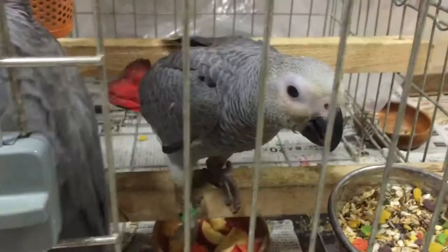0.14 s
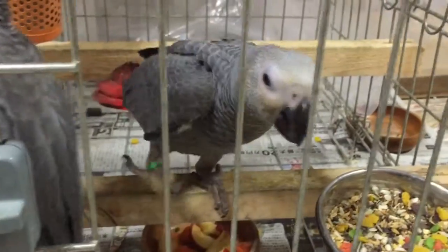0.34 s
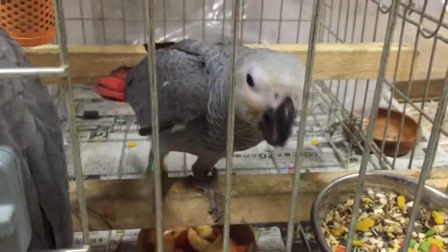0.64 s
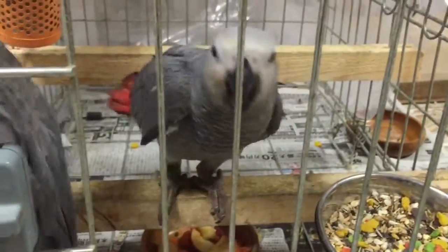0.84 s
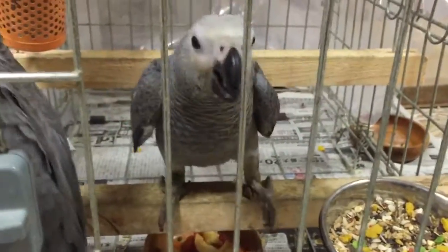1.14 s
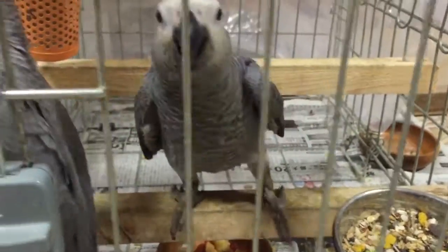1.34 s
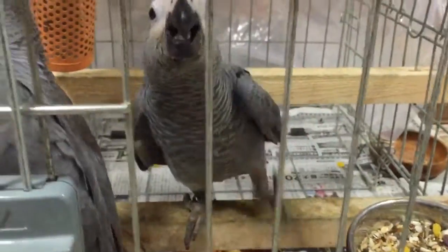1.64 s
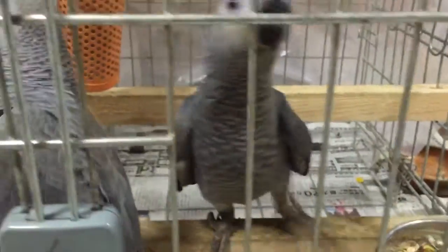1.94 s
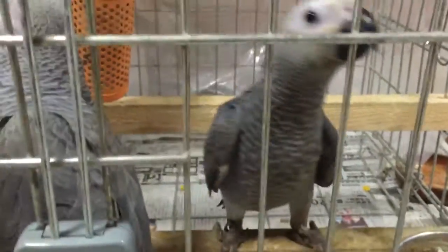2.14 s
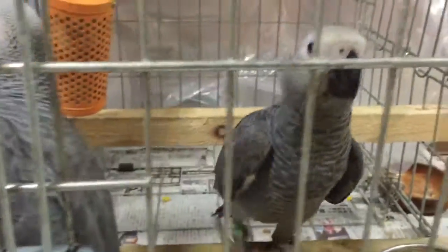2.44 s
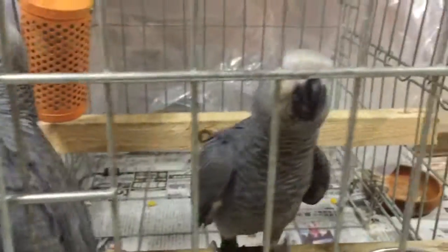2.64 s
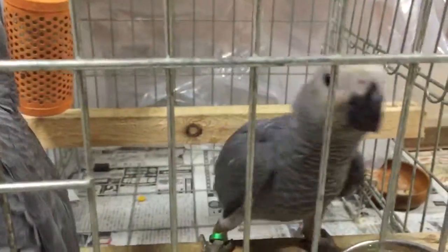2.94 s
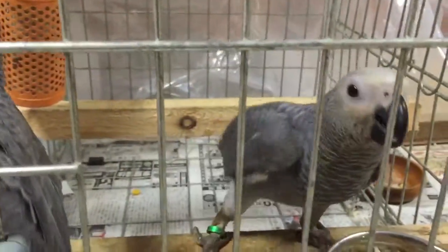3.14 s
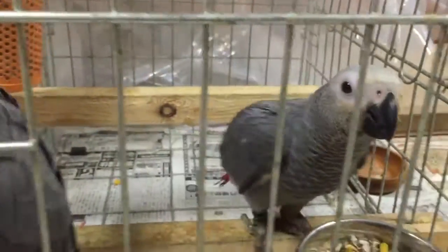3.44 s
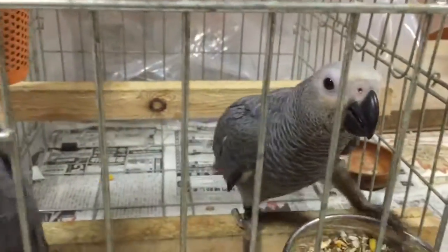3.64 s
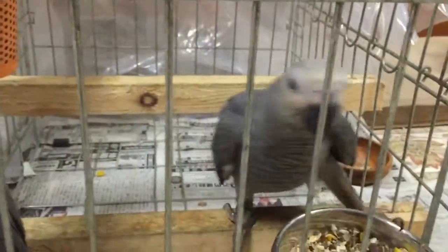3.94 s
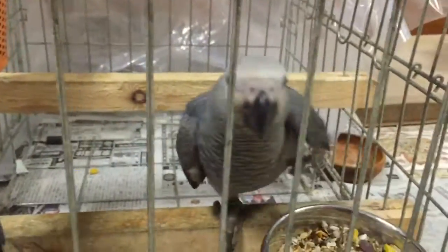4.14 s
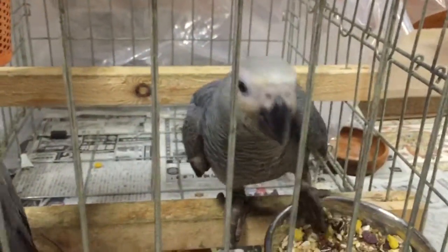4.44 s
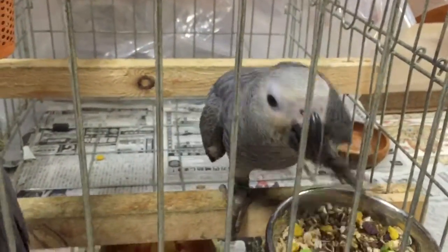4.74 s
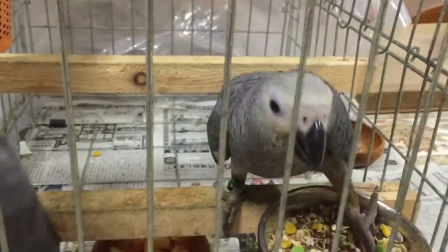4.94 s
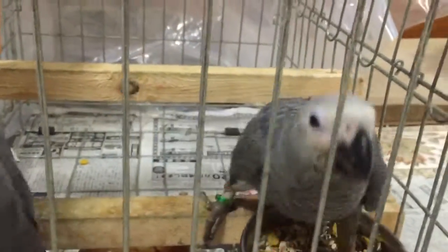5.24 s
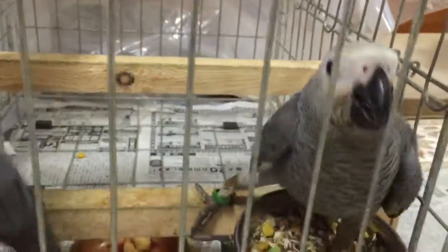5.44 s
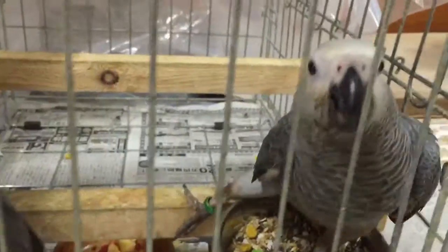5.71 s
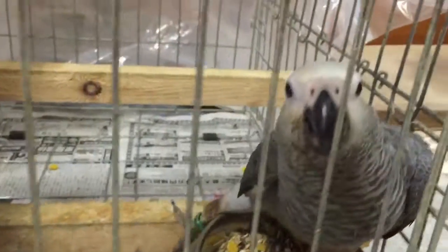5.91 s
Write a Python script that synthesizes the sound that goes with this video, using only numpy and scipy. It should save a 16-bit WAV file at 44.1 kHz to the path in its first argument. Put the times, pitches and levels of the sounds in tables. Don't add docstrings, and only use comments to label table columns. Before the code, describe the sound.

Close to a wire cage in a small quiet room, claws and beaks tick and scrape irregularly on metal bars. A slap with a light door rattle comes early, then sparse clicks, a very short squeak turning hoarse, and bright sharp pecks. Near the end a steel bowl rings, is stopped by two heavy foot landings, and small taps and scratches follow. Low hum and faint hiss lie beneath.

```python
import sys
import numpy as np
from scipy import signal
from scipy.fft import rfft, irfft, next_fast_len
from scipy.io import wavfile
from scipy.ndimage import uniform_filter1d

SR = 44100
rng = np.random.default_rng(int(sys.argv[2]) if len(sys.argv) > 2 else 0)


def convert_level_to_amplitude(level_db):
    exponent = np.asarray(level_db, float) / 20
    return 10 ** exponent


def transcribe(u):
    v = np.clip(np.atleast_2d(u).T, -1, 1)
    q = np.round(v * 32767).astype(np.int16)
    wavfile.write(sys.argv[1], SR, q)


N = 267687
T = np.arange(N) / SR


def unit(x):
    return x / np.sqrt(np.mean(x ** 2))


def fade(t, t60):
    return np.exp(-np.log(1000) * t / np.maximum(t60, .002))


def colour(x, hz, db):
    size = next_fast_len(len(x))
    f = np.maximum(np.fft.rfftfreq(size, 1 / SR), 1)
    gain = convert_level_to_amplitude(np.interp(np.log(f), np.log(hz), db))
    return irfft(rfft(x, size) * gain, size)[:len(x)]


def resonate(x, peaks):
    return sum(convert_level_to_amplitude(db) * signal.lfilter(*signal.iirpeak(hz, hz / max(width, 5), SR), x)
               for hz, width, db in peaks)


def walk(rate_hz, size=N):
    k = int(SR / rate_hz)
    steps = np.repeat(rng.standard_normal(size // k + 1), k)
    return 1.33 * uniform_filter1d(uniform_filter1d(steps, k), k)[:size]


def add(out, start_s, x):
    i = int(round(start_s * SR))
    out[i:i + len(x)] += x[:N - i]


# pitch_hz [Hz], density_db [dB per Hz]
HISS_SPECTRUM = [(15, -27), (25, -5), (49, -1.5), (80, -0.5), (120, -1.5), (223, -12), (516, -21),
                 (775, -20.5), (1230, -19), (1650, -20.5), (5000, -26.5), (9320, -27), (10400, -31.5),
                 (14800, -28.5), (16000, -52)]
# pitch_hz [Hz], width_hz [Hz], level_db [dB]
HUM = [(57.6, 8.8, -70), (101, 16.7, -74)]


def hush():
    hz, db = np.transpose(HISS_SPECTRUM)
    hiss = unit(colour(rng.standard_normal(N), hz, db)) * convert_level_to_amplitude(-68.5 + 0.29 * walk(2.33))
    hum = 0
    for hz, width, db in HUM:
        line = unit(resonate(rng.standard_normal(N), [(hz, width, 0)]))
        hum = hum + convert_level_to_amplitude(db + 2.0 * walk(4.15)) * line
    return hiss + hum


# pitch_hz [Hz], width_hz [Hz], level_db [dB]
MESH = [(1826, 54, 7.5), (2300, 16, -9), (3460, 7.7, -4), (4410, 16, -28.5), (6190, 77, 3),
        (6800, 600, 3.5), (7350, 120, -5.5), (8490, 260, 8), (9180, 110, 7.5), (11370, 140, 4),
        (11930, 97, -4), (13100, 58, 0)]


def wire(x):
    return unit(x) + 0.39 * unit(resonate(x, MESH))


# start_s [s], length_s [s], level_db [dB], weight_db on the perch [dB]
DRAGS = [(0, 0.06, -59.5, -9), (0.597, 0.11, -70.5, 15), (0.845, 0.23, -74, 12.5), (1.09, 0.26, -64.5, 6),
         (1.445, 0.22, -64, 5), (2.553, 0.2, -74, 17), (3.303, 0.43, -70, 10), (3.733, 0.15, -73.5, 14.5),
         (4.411, 0.19, -66.5, -20), (4.88, 0.096, -63.5, 8.5), (4.939, 0.17, -64, 4.5),
         (5.033, 0.23, -60, -13), (5.145, 0.12, -66.5, 0), (5.49, .14, -65, -8), (5.614, 0.15, -65.5, 1),
         (5.719, 0.17, -52, -15), (5.853, 0.18, -61, -11)]


def scrape():
    attack_s, release_share, sag_db = 0.008, 0.55, -8
    slips = wire(rng.standard_normal(N) * convert_level_to_amplitude(0.89 * walk(400) + 3.0 * walk(50)))
    low = unit(colour(slips, [120, 940, 1500, 1650], [-9.5, -6, -1.5, -30.5]))
    mid = unit(colour(slips, [1400, 240, 12000, 5900], [-9.5, -6, -1.5, -30.5]))
    high = unit(colour(slips, [4970, 2100, 12700, 8900], [-9.5, -6, -1.5, -30.5]))
    out = np.zeros(N)
    for start_s, length_s, db, weight_db in DRAGS:
        span = slice(int(start_s * SR), int((start_s + length_s) * SR))
        t = T[span] - start_s
        grip = np.interp(t, [0, attack_s, (1 - release_share) * length_s, length_s], [0, 1, 1, 0])
        grip = grip * convert_level_to_amplitude(db + sag_db * t / length_s)
        highs_db = -12 - 0.39 * max(weight_db, 0)
        out[span] += grip * (convert_level_to_amplitude(weight_db) * low[span] + mid[span] + convert_level_to_amplitude(highs_db) * high[span])
    return out


LOOSE_HZ = [1250, 1900, 2500, 3720, 4200, 5600, 6730, 7400, 8600, 9300, 10300, 11600, 12600, 14200]


def contact(low_db, high_db, hz, size):
    noise = rng.standard_normal((2, size))
    loose = rng.uniform(size=(len(LOOSE_HZ), 2))
    tone_db = [low_db - 43.5, low_db + 9.5, 0, high_db - 1.5, high_db - 5]
    crack, buzz = (colour(n, [350, 1000, 3500, 10000, 16000], tone_db) for n in noise)
    struck = [(f, 60 + 0.025 * f, -10 * np.log10(60 + 0.025 * f)) for f in np.atleast_1d(hz)]
    others = [(f * (1 + .05 * (u - .5)), 130, -14 * v) for f, (u, v) in zip(LOOSE_HZ, loose)]
    crack = unit(crack) + 0.62 * unit(resonate(noise[0], struck))
    buzz = wire(buzz) + 0.8 * unit(resonate(noise[1], struck)) + 0.55 * unit(resonate(buzz, others))
    spread = np.sqrt(1 + convert_level_to_amplitude(2 * low_db) + convert_level_to_amplitude(2 * high_db))
    return spread * crack, spread * buzz * convert_level_to_amplitude(1.6 * walk(300, size))


# start_s [s], peak_db [dB], struck_hz [Hz], rattle_db [dB], at times second_hz [Hz]
FLICKS = [(0.0088, -37, 5600, -19, 6300), (0.802, -45, 5500, -8.5, 4000), (0.9386, -43, 9300, -5),
          (1.029, -54, 6950, -6), (2.1334, -36, 9200, -22.5), (3.6369, -40, 9000, -12, 13000),
          (3.641, -38, 12000, -20, 9500), (4.541, -58, 13000, -25), (4.551, -58, 12000, -25),
          (4.561, -57, 13000, -25), (4.574, -55, 12000, -25)]
PECKS = [(0.8573, -35, 5300, -5), (3.3328, -33.5, 3460, -7, 2000), (3.3855, -29, 7000, -13, 9180),
         (3.6583, -26.5, 8100, -15.5), (4.1766, -25, 8540, -14, 12400), (4.1785, -18, 8540, -24, 11400),
         (4.1812, -27, 12400, -20), (4.1862, -29, 7380, -18), (4.4762, -40, 6600, -11, 4000),
         (4.4925, -25.5, 9600, -28, 12000), (4.5914, -57.5, 1600, -20), (5.111, -55, 2990, -1.5),
         (5.7164, -44.5, 5310, -3, 2350), (5.7412, -35, 6800, -3, 2350)]
CATCHES = [(0.8432, -33, 3600, -10, 5500), (1.8307, -55, 6000, -24), (1.8533, -51, 3270, -26),
           (2.628, -42, 11900, -6, 13200), (1.0918, -46, 4160, -14), (1.1083, -42, 9000, -14),
           (2.552, -52, 4000, -20), (5.519, -34, 5380, -4.5, 7200), (5.486, -45, 3800, -25),
           (3.386, -38, 1300, -3), (3.4888, -23.5, 3900, -22, 9000), (4.1839, -36, 5700, -8, 1280),
           (5.0884, -42.5, 8940, -11.5), (5.1275, -30, 2300, -16, 11000), (5.2165, -31, 3400, -4, 5030),
           (5.3674, -44.5, 3400, -7.5), (5.591, -34.5, 1870, -12), (5.892, -40.5, 2620, -14)]
PATS = [
    (0.5901, -40.5, 4600, -5, 6000),
    (.6068, -19, 3400, -19, 2900),
    (0.6647, -34, 1490, -15.5),
    (1.1956, -43, 1890, -5),
    (5.663, -40, 3400, -15),
]
BITES = [
    (1.7637, -49, 6460, -12.5),
    (3.582, -61.5, 1430, -5),
    (3.615, -34, 11000, -22),
    (3.6472, -21, 6500, -16, 3800),
    (3.919, -51.5, 10100, -17),
    (4.8062, -54.5, 1140, -15),
    (4.8795, -46, 12500, -11.5),
    (5.3466, -43.5, 3460, -18),
]
GRIPS = [
    (0.6298, -36, 1910, -14),
    (3.7498, -30, 1240, -16, 6500),
    (4.8984, -45.5, 1800, -12.5),
    (5.6933, -42.5, 3000, -12),
]
LANDINGS = [
    (2.5632, -33.5, 2900, -17, 2000),
    (3.415, -28, 1940, -16, 3800),
    (5.4325, -27, 1700, -26),
    (4.9744, -49, 1200, -13.5),
    (5.4294, -20.5, 1700, -24),
    (5.4586, -20, 1750, -26),
    (5.6322, -38, 2650, -31),
    (5.679, -39.5, 1380, -29),
    (5.685, -36.5, 2650, -24),
]


def ticks():
    out, t = np.zeros(N), T[:8192]
    crack_s = 0.00089
    blow = (np.exp(-t / crack_s) + .2 * np.exp(-t / .005)) * np.minimum(t / .0007, 1)
    # lows dB, highs dB, its events
    kinds = [(-33, -1, FLICKS), (-22, 5.9, PECKS), (-20, -7, CATCHES), (-14.5, -15.5, PATS),
             (-6, 7, BITES), (-8, -4.5, GRIPS), (0, -21.5, LANDINGS)]
    for low_db, high_db, rows in kinds:
        for start_s, db, hz, rattle_db, *second_hz in rows:
            crack, buzz = contact(low_db, high_db, [hz, *second_hz], len(t))
            snap = crack * blow * 1.177 * np.std(crack) / np.max(np.abs(crack * blow))
            rattle_t60_s = 0.18 * convert_level_to_amplitude(0.47 * (rattle_db + 11.5))
            shake = convert_level_to_amplitude(rattle_db) * fade(t, rattle_t60_s) * np.minimum(t / 0.00057, 1)
            add(out, start_s + 0.00019, convert_level_to_amplitude(db - 4.5) * (snap + 0.56 * buzz * shake))
    return out


# start_s [s], peak_db [dB], wire_hz [Hz], length_ms [ms], at times second_hz [Hz]
NAIL_SLIDES = [
    (.3273, -50.5, 2830, 14),
    (2.768, -46, 4110, 12),
    (2.778, -34.5, 5600, 18.3, 4110),
    (2.782, -42, 5600, 12, 6730),
    (4.3435, -61, 2280, 24),
]
CLAW_SLIDES = [(.051, -57, 4260, 9.2), (2.156, -69, 12000, 13), (1.091, -51, 4250, 30),
               (2.0517, -59, 6360, 8.5), (2.636, -51, 12000, 14, 3800), (1.3892, -46, 5300, 31, 9400),
               (3.479, -38, 9000, 8), (3.03, -63.5, 5300, 16), (4.4253, -41, 4300, 34, 12000),
               (5.0314, -37.5, 4000, 23.4, 9000), (5.504, -42, 6500, 28, 3800), (5.87, -42, 2290, 24),
               (5.892, -35, 2290, 26, 1900)]
BEAK_SLIDES = [
    (2.5765, -47, 13000, 12, 6500),
    (3.037, -57, 14000, 7),
    (3.47, -41, 9180, 12),
    (4.392, -57.5, 8400, 20),
    (5.183, -41.5, 13100, 19, 3700),
    (5.8408, -46, 3900, 75, 6360),
]
FOOT_SLIDES = [(1.1088, -38, 1240, 61, 2300), (1.4091, -47, 5640, 20, 2000), (1.4535, -40, 1840, 42, 4000),
               (1.464, -39, 2300, 28, 6500), (1.775, -65, 6700, 18), (2.5744, -45, 1250, 24, 3800),
               (3.319, -42.5, 2300, 49), (4.084, -56, 1800, 10, 8800), (4.0947, -51, 1800, 6),
               (4.142, -45.5, 3680, 10, 1270), (4.745, -63.5, 1940, 17), (4.9126, -44, 5170, 18)]


def swipes():
    out, t = np.zeros(N), T[:8192]
    # lows dB, highs dB, its events
    kinds = [(-50, -9, NAIL_SLIDES), (-13, -0.5, CLAW_SLIDES),
             (-15, 1.5, BEAK_SLIDES), (-10.5, -8, FOOT_SLIDES)]
    for low_db, high_db, rows in kinds:
        for start_s, db, hz, ms, *second_hz in rows:
            buzz = contact(low_db, high_db, [hz, *second_hz], len(t))[1]
            swell = np.minimum(t / (0.002 + .0001 * ms), 1)
            slide = swell * fade(np.maximum(t - ms / 1000, 0), 0.0053 * ms)
            add(out, start_s - .002, convert_level_to_amplitude(db - 17.5) * buzz * slide)
    return out


# start_s [s], peak_db [dB], pitch_hz [Hz]
KNOCKS = [(.488, -48, 396), (.606, -34, 1210), (.786, -55.5, 364), (1.05, -55, 377), (1.104, -37.5, 456),
          (1.12, -37.5, 190), (1.46, -44, 873), (1.765, -56.5, 392), (2.56, -48, 1196), (5.367, -46.5, 355),
          (5.385, -52, 350), (5.403, -52, 340), (4.876, -48, 1250), (2.551, -52, 420), (5.427, -27, 803),
          (5.457, -25.5, 788)]
# start_s [s], peak_db [dB], pitch_hz [Hz]
THUMPS = [(.612, -46, 254), (.869, -62, 406), (1.139, -43, 141), (1.168, -49.5, 104), (1.198, -53, 136.6),
          (1.458, -49, 240), (1.516, -49.5, 228), (2.576, -61, 96), (2.66, -76, 101), (3.051, -57.5, 234),
          (3.41, -50, 427), (4.748, -55, 95), (4.889, -54, 91), (5.432, -43, 380), (5.459, -33, 344)]
# start_s [s], peak_db [dB], pitch_hz [Hz]
CLUNKS = [
    (0.499, -46, 557),
    (.606, -47, 657),
    (2.562, -46.5, 470),
    (2.629, -58, 383),
    (3.08, -55, 359),
    (5.27, -60, 366),
    (5.429, -27.5, 543),
    (5.458, -18.5, 654),
]
# start_s [s], peak_db [dB], pitch_hz [Hz]
TAPS = [
    (4.875, -43, 416),
    (5.5518, -26, 970),
    (5.591, -43, 700),
    (5.632, -50, 700),
    (5.662, -58, 700),
    (5.678, -43, 754),
    (5.694, -44, 800),
    (5.743, -46.5, 640),
]


def knocks():
    out, t = np.zeros(N), T[:8192]
    # pitch ratio, level dB, decay ratio
    modes = [(1, 3.0, 1.12), (0.718, -1.5, 0.88), (0.503, -19, 1.7), (1.9, -5, 0.76), (2.22, -3.5, 0.3)]
    for light_t60_s, rows in [(0.076, KNOCKS), (0.11, THUMPS), (0.067, CLUNKS), (0.039, TAPS)]:
        for start_s, db, hz in rows:
            t60 = light_t60_s * convert_level_to_amplitude(-0.41 * (db + 48))
            ring = sum(convert_level_to_amplitude(g) * np.sin(2 * np.pi * hz * ratio * t) * fade(t, t60 * decay)
                       for ratio, g, decay in modes)
            add(out, start_s + 0.00151, convert_level_to_amplitude(db - 4.5) * ring * np.minimum(t / 0.0009, 1))
    return out


def metal(modes, start_s, level_db, push_ms, crowding):
    out, t = np.zeros(N), T[:22050]
    place = np.arange(-2, 3)[:, None]
    ring = 0
    for hz, db, t60 in modes:
        off, turn = rng.uniform(-1, 1, (2, 5, 1))
        near_hz = hz + crowding * 32 * (place + .45 * off)
        near = np.sin(2 * np.pi * near_hz * t + np.pi * turn) * convert_level_to_amplitude(-3.0 * np.abs(place))
        flutter = convert_level_to_amplitude(db + 2.2 * crowding * walk(70, len(t)))
        ring = ring + 0.75 * flutter * fade(t, t60) * near.sum(axis=0)
    push = np.sin(np.pi / 2 * np.clip(t / (max(push_ms, .3) / 1000), 0, 1))
    add(out, start_s, convert_level_to_amplitude(level_db) * ring * push)
    return out


# pitch_hz [Hz], level_db [dB], t60_s [s]
DOOR = [(1197, -32, 0.18), (1570, -3.5, 0.29), (1830, -4, 0.46), (2800, -12, 0.24), (3800, -8, .25),
        (4650, -3, .15)]


def door():
    return metal(DOOR, start_s=0.608, level_db=-47.5, push_ms=5.4, crowding=2.05)


# pitch_hz [Hz], level_db [dB], t60_s [s]
TRAY = [(1244, -7.5, 0.35), (1500, -2.5, 0.31), (1800, -11.5, 0.21)]


def tray():
    first = metal(TRAY, start_s=.612, level_db=-44.5, push_ms=4.6, crowding=1.5)
    second = metal(TRAY, start_s=3.75, level_db=-49, push_ms=3.4, crowding=1.2)
    faint = metal(TRAY, start_s=4.19, level_db=-66.5, push_ms=5.5, crowding=0.8)
    return first + second + faint


# pitch_hz [Hz], level_db [dB], t60_s [s]
BAR = [(1940, 6, 0.05), (1960, -14.5, 0.36), (1490, -22, 0.35), (5080, -19, 0.27), (5300, -11.5, 0.19),
       (5520, -1.5, 0.046), (5840, -10, 0.067)]


def bar():
    return metal(BAR, start_s=0.857, level_db=-28.5, push_ms=5.6, crowding=0.806)


UPPER_DB = [-39, -30, -39, -49]


def voice(hz, gain, rough):
    size = len(gain)
    phase = 2 * np.pi * np.cumsum(hz * (1 + .035 * rough * walk(200.3, size))) / SR
    overtones_db = [-17.5 + 13 * rough, -22 + 13 * rough, *UPPER_DB]
    tone = np.sin(phase)
    for multiple, db in enumerate(overtones_db, 2):
        tone = tone + convert_level_to_amplitude(db + 5.0 * rough * walk(218, size)) * np.sin(multiple * phase)
    return np.sqrt(2) * gain * convert_level_to_amplitude(3.5 * rough * walk(200, size)) * tone, phase


# pitch_hz [Hz], width_hz [Hz], level_db [dB]
BEAK = [(2485, 340, 3.5), (2990, 200, 2.5), (4700, 2300, -9), (1690, 310, 2)]
# start_s [s], level_db [dB], roughness [0-1]
SQUEAK = [
    (3.03, -62, .6),
    (3.056, -46.5, 0.5),
    (3.072, -49, .03),
    (3.08, -35, 0),
    (3.087, -30.5, 0),
    (3.094, -33.5, 0.05),
    (3.101, -43, 0.8),
    (3.122, -44, 0.8),
    (3.19, -54, 0.7),
]
MIXING_DB = [-12, -11, -10, -25, -27, -30, -33, -36]


def squeak():
    squeak_s, lower_s = 3.0, 3.1
    out, t = np.zeros(N), squeak_s + T[:16384]

    def swell(start_s, db, attack_s, hold_s, t60_s):
        rise = np.clip((t - start_s) / attack_s, 0, 1)
        return convert_level_to_amplitude(db) * rise * fade(np.maximum(t - start_s - attack_s - hold_s, 0), t60_s)

    s, db, rough = np.transpose(SQUEAK)
    gate = np.interp(t, [s[0], s[0] + 0.0041, s[-1] - .01, s[-1]], [0, 1, 1, 0])
    up = gate * convert_level_to_amplitude(np.interp(t, s, db))
    down = swell(lower_s, -43, attack_s=.018, hold_s=0, t60_s=.28)
    upper, a = voice(1615, up, np.clip(np.interp(t, s, rough), 0, 1))
    lower_hz = 1364 + 138.7 * np.exp(-np.maximum(t - lower_s, 0) / 0.0113)
    lower, b = voice(lower_hz, down, .75)
    sums = (a + b, a + 2 * b, 2 * a + b, 2 * a + 2 * b, 3 * a + 2 * b, 4 * a + 2 * b, 7 * a + b, 8 * a + b)
    mixed = np.sqrt(up * down) * sum(convert_level_to_amplitude(g) * np.sin(phase) for g, phase in zip(MIXING_DB, sums))
    air = resonate(resonate(rng.standard_normal(len(t)), BEAK), BEAK)
    rasp = unit(air) * swell(3.012, -51, attack_s=.01, hold_s=0.05, t60_s=.06)
    add(out, squeak_s, upper + lower + mixed + rasp)
    return out


# pitch_hz [Hz], level_db [dB], t60_s [s]
LATCH = [(1270, -1, 0.3), (2396, -2, 0.26), (3670, -8, 0.24), (5740, 9, 0.1), (9300, -8, .12),
         (10700, -8, 0.2)]


def latch():
    return metal(LATCH, start_s=4.178, level_db=-49, push_ms=0.58, crowding=1.84)


def held():
    return fade(np.maximum(T - 5.43, 0), .05)


# pitch_hz [Hz], level_db [dB], t60_s [s]
BOWL = [(1016, -13, 0.7), (1420, -16.5, 0.7), (1680, -17, .6), (3620, -14, .4), (5030, -12, .4),
        (2774, -11, 0.17), (4274, -21, .22), (5200, -5.5, 0.22), (5640, -5, 0.16), (6400, -22, 0.11),
        (9200, -11, 0.22), (8600, -14, .15), (12500, -23, 0.17)]


def bowl():
    return metal(BOWL, start_s=5.217, level_db=-37, push_ms=5.5, crowding=1.7) * held()


# pitch_hz [Hz], level_db [dB], t60_s [s]
RIM = [(3375, 0, 1.3)]


def rim():
    return metal(RIM, start_s=5.217, level_db=-48, push_ms=11, crowding=0.13) * held()


# pitch_hz [Hz], t60_s [s]
ROOM = [(150, 0.13), (1500, 0.31), (5000, 0.22), (14000, 0.17)]


def room(x, wet_db, stretch):
    t, (hz, t60) = T[:20000], np.transpose(ROOM)
    tail = 0
    for centre in 125 * 2. ** np.arange(8):
        band = colour(rng.standard_normal(len(t)), [centre / 2, centre, 2 * centre], [-30, 0, -30])
        tail = tail + band * fade(t, stretch * np.interp(np.log(centre), np.log(hz), t60))
    tail = tail * np.clip((t - .004) / 0.0017, 0, 1)
    return x + convert_level_to_amplitude(wet_db) * signal.fftconvolve(x, tail / np.sqrt(np.sum(tail ** 2)))[:N]


def scene():
    near = ticks() + swipes() + knocks() + scrape() + bowl() + door() + latch()
    heard = room(near, wet_db=-15, stretch=0.87)
    heard = heard + room(bar(), wet_db=-4.5, stretch=1.47) + room(squeak(), wet_db=-6, stretch=1.25)
    return (heard + hush() + rim() + tray())[None]


def top_cut(x):
    return signal.sosfilt(signal.butter(12, 16500, fs=SR, output="sos"), x)


def record(dry):
    x = signal.sosfilt(signal.butter(2, 44, "high", fs=SR, output="sos"), dry)
    x = signal.sosfilt(signal.ellip(7, .5, 24, 15350, fs=SR, output="sos"), x)
    return top_cut(x)


dry = scene()
out = record(dry)
transcribe(out)
```